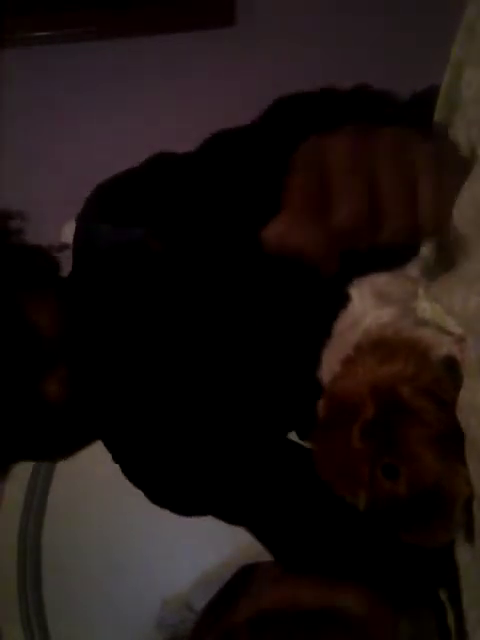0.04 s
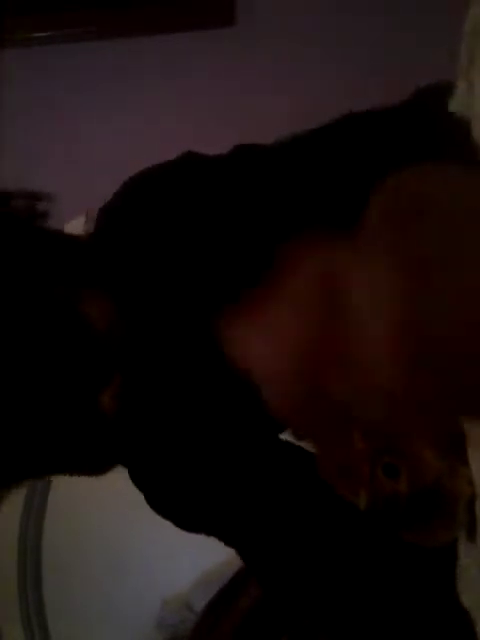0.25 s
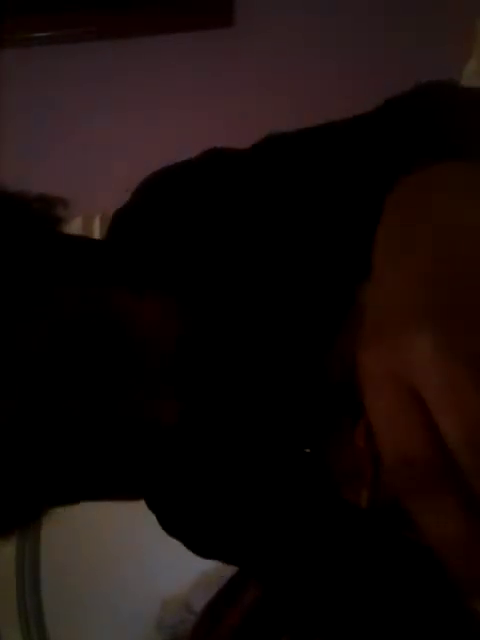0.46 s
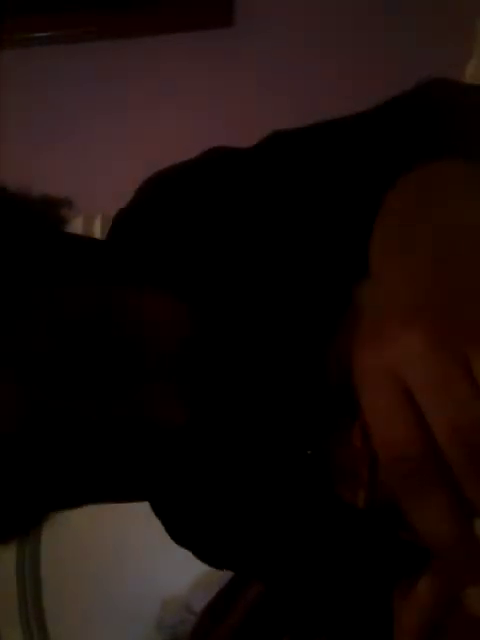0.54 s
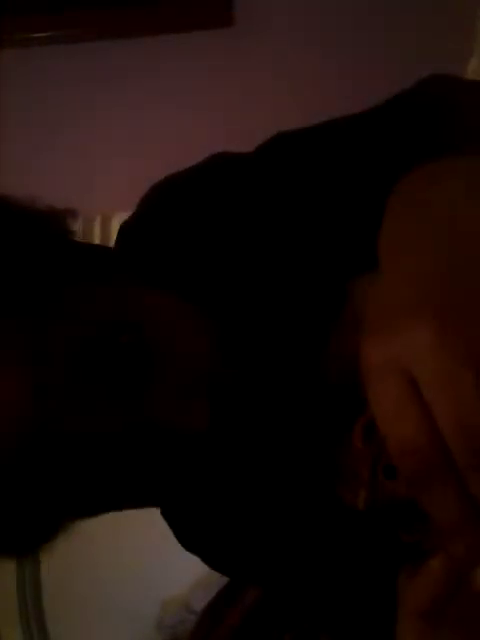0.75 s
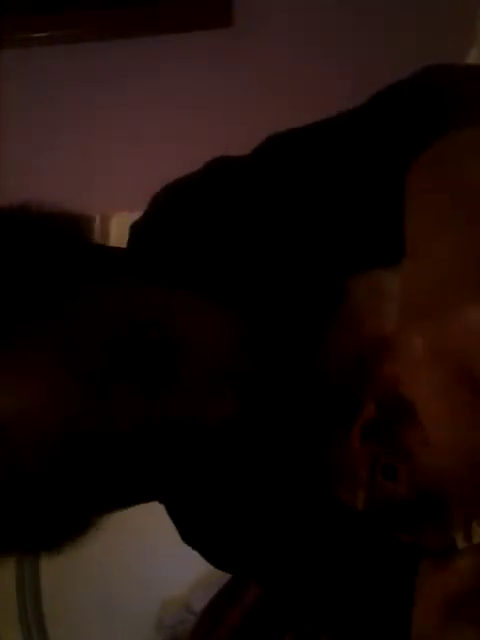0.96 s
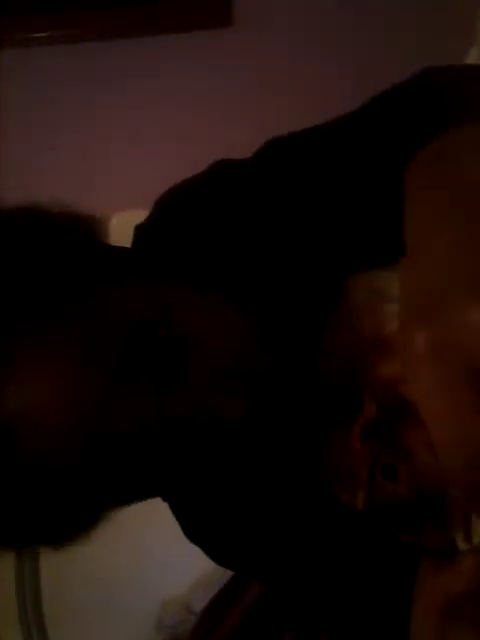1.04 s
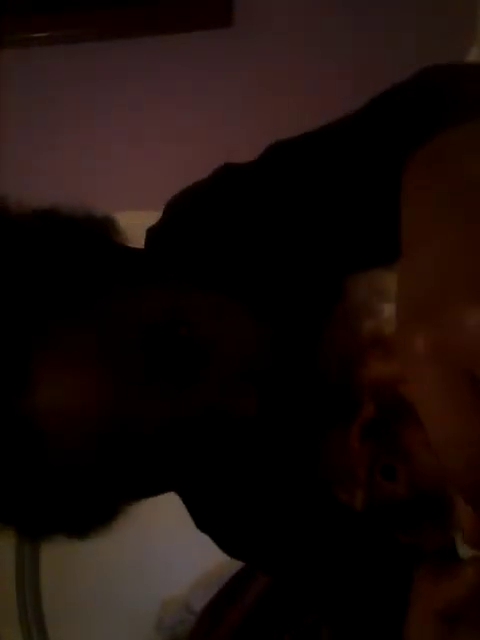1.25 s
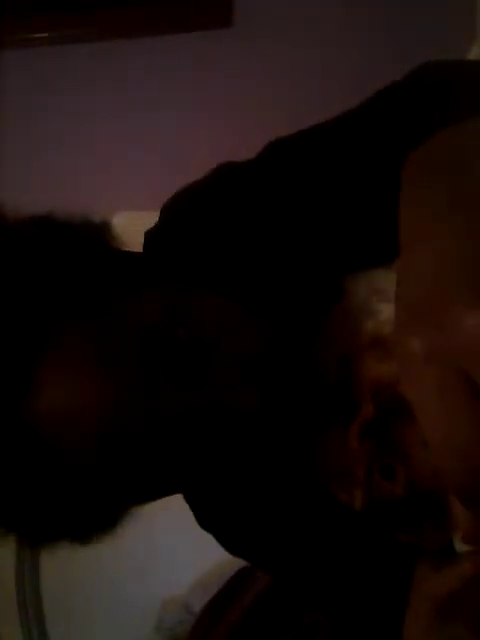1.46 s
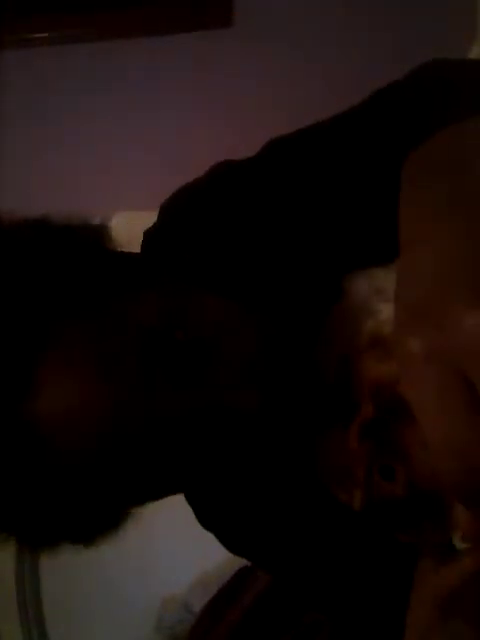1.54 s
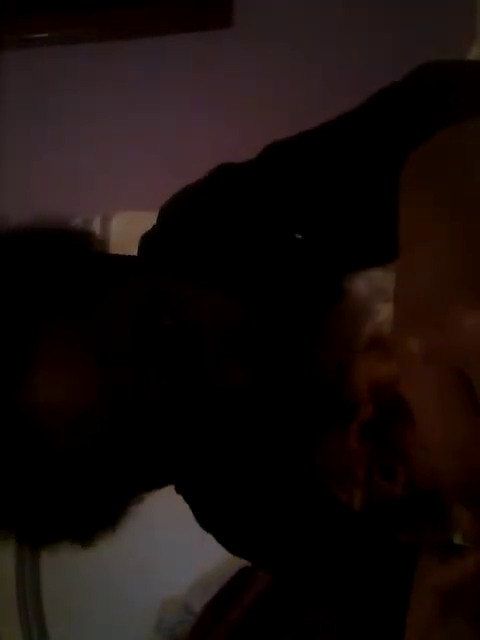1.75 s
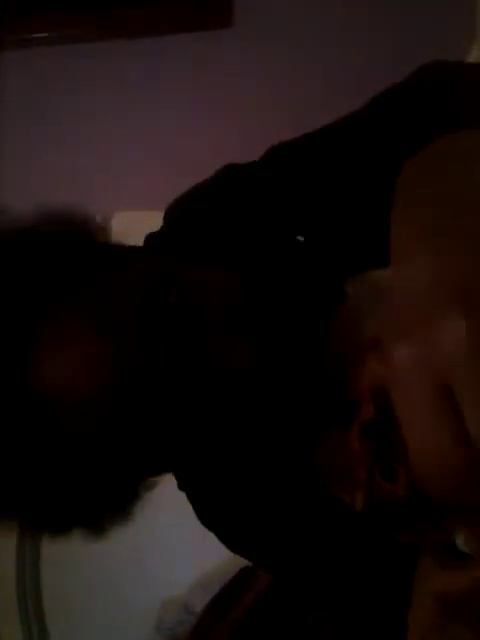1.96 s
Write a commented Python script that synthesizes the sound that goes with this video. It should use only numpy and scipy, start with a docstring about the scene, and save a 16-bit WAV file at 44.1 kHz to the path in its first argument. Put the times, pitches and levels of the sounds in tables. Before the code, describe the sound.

Four clear, whistling guinea pig squeals sweep upward one after another with uneven pauses, some starting with a rough croak or crack; one soft rustle, short room ring and low appliance hum, recorded close in stereo.

```python
"""A small whimper, then four rising squeals: a guinea pig close to the microphone in a quiet bedroom.
Each squeal is a nearly pure tone with weaker overtones shaped by the throat; rougher sounds lead into
the first three and a very faint falling tone comes just before the fourth, which turns hoarse for a moment.
Short spits of noise mark the cracks of the voice, and one soft rustle of handling is made of noise.
A decaying noise tail makes the room ring briefly over room noise and a low, wavering appliance hum."""
import sys
import numpy as np
from scipy import signal
from scipy.fft import rfft, irfft
from scipy.io import wavfile

SR = 44100
rng = np.random.default_rng(int(sys.argv[2]) if len(sys.argv) > 2 else 0)


def master_out(mix):
    """Clip the mix to full scale and print it as 16-bit PCM to the path in sys.argv[1]."""
    frames = np.transpose(np.atleast_2d(mix))
    ceiling = np.clip(frames, -1, 1)
    pcm = np.round(ceiling * 32767).astype(np.int16)
    wavfile.write(sys.argv[1], SR, pcm)


N = 88376
TIME = np.arange(N) / SR   # seconds
BINS = np.maximum(np.arange(N + 1) * SR / (2 * N), 1)   # Hz, for transforms of length 2 N


def from_db(db):
    """Decibels to gain."""
    return 10 ** (np.asarray(db) / 20)


def rms_one(x):
    """Scale to unit rms."""
    return x / np.sqrt(np.mean(x ** 2) + 1e-20)


def at_hz(points, hz, axis=1):
    """Read a column of a table on a log-frequency axis."""
    points = np.array(points)
    return np.interp(np.log(hz), np.log(points[:, 0]), points[:, axis])


def filtered(x, response):
    """Apply a frequency response, zero-padded to twice the length."""
    return irfft(rfft(x, 2 * N) * response)[..., :N]


def noise(spectrum):
    """Coloured noise of unit rms: the table gives only the shape of its spectrum."""
    return rms_one(filtered(rng.standard_normal(N), from_db(at_hz(spectrum, BINS))))


def drift(hz):
    """Random wandering of unit rms, mostly slower than hz."""
    return rms_one(filtered(rng.standard_normal(N), 1 / (1 + (BINS / hz) ** 2)))


def gate(start, end, attack, release):
    """Fully open from start to end, with smooth edges outside."""
    nearness = np.minimum((TIME - start) / attack, (end - TIME) / release)
    return np.sin(np.pi / 2 * np.clip(nearness + 1, 0, 1)) ** 2


# Throat response, low and high part. Each row: frequency in Hz, gain in dB.
THROAT_LOW = [(1000, -1.5), (1500, 5.5)]
THROAT_HIGH = [(1800, -13.5), (2100, 3), (2400, -10), (2750, -6), (3100, -9), (3600, -14.5), (4100, -10),
               (4500, -12.5), (4950, -6), (5450, -13), (5950, -20.5), (6700, -38), (7400, -38), (7900, -50),
               (8500, -40.5), (9500, -52), (11000, -80)]
# Spectrum shape of the breath. Each row: frequency in Hz, relative level in dB per Hz.
BREATH = [(300, -33), (700, -13.5), (1100, 5.5), (2300, -9), (3500, -14), (5100, -11), (6200, -24),
          (7200, -39), (10000, -39), (16000, -60.5)]
# Where the voice doubles its period. Each row: start in s, end in s, strength of the half-tones in dB.
HOARSE = [(1.618, 1.668, -1)]
# Half-tones before that strength. Each row: frequency in Hz, level in dB relative to the fundamental.
HALF_TONES = [(450, -27), (1380, -13.5), (2300, -15.5), (3200, -26.5), (4100, -23), (5000, -29),
              (5950, -41), (6800, -59.5)]
HOARSE_EDGE_S, HOARSE_JITTER = 0.01, 0.0049   # jitter and waver are rms shares of the pitch
JITTER_HZ, WAVER, WAVER_HZ = 260, .003, 35.5
OVERTONE_FLUTTER_DB, FLUTTER_HZ = 1, 38


def voice(rows, attack, release, jitter, breath_db, count=8):
    """A strong fundamental, overtones through the throat, hoarse half-tones, breath pulsing each cycle."""
    seconds, *columns = np.transpose(rows)
    envelope = gate(seconds[0], seconds[-1], attack, release)
    on = envelope > 0
    pitch, level_db, overtone_db, slope_db = (np.interp(TIME[on], seconds, c) for c in columns)
    hoarse = sum(from_db(db) * gate(start, end, HOARSE_EDGE_S, HOARSE_EDGE_S)[on]
                 for start, end, db in HOARSE)

    unsteady = (jitter + HOARSE_JITTER * hoarse) * drift(JITTER_HZ)[on]
    unsteady += WAVER * drift(WAVER_HZ)[on]
    phase = 2 * np.pi * np.cumsum(pitch * (1 + unsteady)) / SR

    breath = from_db(breath_db) * noise(BREATH)[on] * (1 + np.cos(phase))
    tone = np.cos(phase) + breath
    throat = list(THROAT_LOW) + list(THROAT_HIGH)
    for k in range(1, count):
        whole, half = k + 1, k - .5   # multiples of the pitch
        strength = from_db(overtone_db + OVERTONE_FLUTTER_DB * drift(FLUTTER_HZ)[on])
        colour = from_db(at_hz(throat, whole * pitch) + slope_db * np.log2(whole / 2))
        tone += strength * colour * np.cos(whole * phase)
        tone += hoarse * from_db(at_hz(HALF_TONES, half * pitch)) * np.cos(half * phase)

    out = np.zeros(N)
    out[on] = tone * from_db(level_db) * envelope[on]
    return out


# The four squeals, close up, before ports and room. Each row: time in seconds, pitch in Hz,
# level of the fundamental in dB, overtones relative to it in dB before the throat,
# their slope in dB per octave above the second harmonic.
SQUEAL_1 = [(0.093, 996, -31, -32.5, -2), (0.1, 1008, -25.5, -35, 6), (0.111, 1218, -23, -14.5, -12),
            (0.13, 1318, -19.5, -11.5, -7.5), (0.137, 1185, -18.0, -6, -5), (0.157, 1232, -18, -4.0, -8),
            (0.18, 1340, -16.5, -9.5, 2), (0.205, 1508, -22.0, 0.5, -7), (0.23, 1677.0, -21.0, -1.5, -8),
            (0.245, 1813, -19.5, -7.5, -1.5), (0.28, 1946, -23, -9.5, 4), (0.315, 2034, -20, -14.5, -3.5),
            (0.35, 2019, -28, -15.5, -1.5)]
SQUEAL_2 = [(.532, 981.6, -15, -10.5, -2), (0.546, 999, -12, -14.5, -5), (0.566, 1147, -12.5, -13.5, -8.5),
            (.587, 1178, -11, -17.5, -5.5), (.603, 1276, -11.5, -16, 0.5), (0.622, 1377, -11.5, -28.5, 5.5),
            (0.636, 1421, -13, -22, 4), (0.664, 1562, -13.5, -4.5, -13), (.7, 1714, -14.5, -17.5, 5.5),
            (0.732, 1786, -18.5, -8, -6.5), (0.754, 1848, -26.5, -4.5, -26)]
SQUEAL_3 = [(0.972, 1169, -25.0, -9, -11.5), (0.984, 1214, -18, -5, -17.5), (1.025, 1181, -17.0, -5.0, -8),
            (1.07, 1215, -17.0, -1.5, -11), (1.1, 1277, -15.5, -5, -9), (1.118, 1387, -15.5, -7, -7.5),
            (1.137, 1557, -16.5, 0.5, -7), (1.16, 1668, -15.5, -5.5, -6), (1.196, 1790, -20.0, -1.0, -10.5),
            (1.226, 1857, -27, -4, -24)]
SQUEAL_4 = [(1.578, 1063, -23, -9, -7.5), (1.606, 1011, -20, -8, -7), (1.618, 932, -21.5, -6, -9),
            (1.644, 908.2, -22.5, -4, -12.5), (1.671, 932, -21.5, -9, -10.5),
            (1.687, 992.6, -19, -10.5, -9.5), (1.707, 1027, -23, -11, -8.5), (1.741, 1185, -24.5, 0, -22),
            (1.774, 1213, -24.5, 0, -23), (1.815, 1345, -23, -8.5, -22), (1.845, 1371, -24.5, -13.5, -17.5)]
# Half-voiced sounds that lead into the first three squeals. Each row: the same columns and units.
WHIMPER = [(.007, 871, -43.5, -22.5, -12), (.027, 740, -37, -20, -14), (.042, 783, -40, -17, -8.5),
           (.052, 970, -38.5, -11, -10.5), (.059, 830, -44, -3.5, -10)]
CROAK = [(0.5183, 753, -33.5, 5, -3), (0.521, 808, -28, -2, -1), (0.527, 804, -29, -2.5, 2)]
PEEP = [(.956, 1413, -44, -23.5, -4.5), (0.966, 1387, -53.5, -24, -9.5)]
# A very faint falling tone just before the fourth squeal. Each row: the same columns and units.
FAINT_GLIDE = [(1.554, 1126, -49, -17.5, -6), (1.572, 1045, -40.5, -25, -12)]
# Cracks of the voice. Each row: time of the peak in seconds, level in dB, decay constant in seconds.
CRACKS = [(.134, -36, 0.0046), (0.5196, -32, 0.0016), (0.531, -29.5, .002), (.617, -40, 0.0046),
          (0.98, -34.5, 0.0031), (1.578, -40, 0.0016), (1.612, -38, 0.0073)]
ATTACK_S, RELEASE_S, ROUGH_EDGE_S = .005, 0.014, .003
JITTER, ROUGH_JITTER = 0.0016, 0.019   # rms share of the pitch
BREATH_DB, ROUGH_BREATH_DB = -39, -20.5   # relative to the tone, before the pulsing
CRACK_RISE_S = 0.00095


def guinea_pig():
    """Clear squeals, rougher sounds before them, and a spit of noise at each crack of the voice."""
    squeals = sum(voice(rows, ATTACK_S, RELEASE_S, JITTER, BREATH_DB)
                  for rows in (SQUEAL_1, SQUEAL_2, SQUEAL_3, SQUEAL_4))
    rough = sum(voice(rows, ROUGH_EDGE_S, ROUGH_EDGE_S, ROUGH_JITTER, ROUGH_BREATH_DB)
                for rows in (WHIMPER, CROAK, PEEP, FAINT_GLIDE))
    cracks = 0
    for peak, db, decay in CRACKS:
        fall = np.maximum((peak - TIME) / CRACK_RISE_S, (TIME - peak) / decay)
        cracks = cracks + from_db(db) * np.exp(-fall)
    return squeals + rough + cracks * noise(BREATH)


# Soft handling near the microphone. Each row: time of the peak in seconds, level in dB, width in seconds.
RUSTLES = [(0.404, -50.5, 0.017)]


def rustle():
    """A brief soft swell of noise, with the same colour as the breath."""
    swell = sum(from_db(db) * np.exp(-((TIME - peak) / width) ** 2) for peak, db, width in RUSTLES)
    return noise(BREATH) * swell


# The two microphone ports. Each row: frequency in Hz, left leads by radians, left minus right in dB.
PORTS = [(100, 0.13, -4), (926, .4, -2), (1200, 0.75, 0), (1800, 0.63, 3.5), (2620, 0.48, 0.2),
         (4000, 1.2, 0), (5030, 1.58, 5), (7000, 1.1, 1), (16000, 0.059, 0)]


def ports(x):
    """The direct sound leads at the left port; which port is louder depends on frequency."""
    half = from_db(at_hz(PORTS, BINS, axis=2) / 2) * np.exp(.5j * at_hz(PORTS, BINS, axis=1))
    return filtered(x, np.array([half, 1 / half]))


# Colour of the bedroom's reverberation. Each row: frequency in Hz, gain in dB added to ROOM_DB.
ROOM_COLOUR = [(300, -5), (1000, -2.5), (2000, 4), (3500, 5), (5300, 5), (8000, -2.5)]
ROOM_DB, ROOM_ONSET_S, ROOM_T60_S = -19, .004, .5
EARLY_DB, EARLY_T60_S = 6.5, 0.22   # nearby surfaces, relative to the start of the tail


def bedroom(x):
    """Quick reflections from nearby surfaces and a short diffuse tail, different at each port."""
    decay = from_db(-60 * TIME / ROOM_T60_S) + from_db(EARLY_DB - 60 * TIME / EARLY_T60_S)
    tail = rng.standard_normal((2, N)) * decay * (TIME > ROOM_ONSET_S)
    tail /= np.sqrt(np.sum(tail ** 2, axis=1, keepdims=True))   # unit energy
    return filtered(x, rfft(tail, 2 * N) * from_db(ROOM_DB + at_hz(ROOM_COLOUR, BINS)))


# Spectrum shape of the room noise. Each row: frequency in Hz, relative level in dB per Hz.
FLOOR = [(25, -30.5), (45, -13.5), (80, -15.5), (120, -10), (160, -8.5), (235, -1.5), (275, -3),
         (320, -14.5), (500, -12.5), (1000, -14), (2000, -19.5), (4000, -25), (5200, -30.5), (6500, -38.5),
         (9000, -39), (16000, -44)]
# How alike the noise is at both ports. Each row: frequency in Hz, left-right likeness (correlation).
FLOOR_LIKENESS = [(50, 0.37), (250, 0.84), (1000, 0), (4000, 0), (8000, 0)]
# Appliance hum, equal at both ports. Each row: frequency in Hz, rms level in dB before the waver.
HUM = [(120, -62.5), (265.5, -57.5), (441, -68)]
FLOOR_DB = -50.5   # rms at each port
HUM_WAVER, HUM_WAVER_HZ = 0.24, 3.7   # rms share of the level; speed


def background():
    """Room noise, partly shared by the ports, and an appliance hum of sines that waver in level."""
    alike = np.clip(at_hz(FLOOR_LIKENESS, BINS), -1, 1)
    mid = filtered(noise(FLOOR), np.sqrt((1 + alike) / 2))
    side = filtered(noise(FLOOR), np.sqrt((1 - alike) / 2))
    hum = 0
    for hz, db in HUM:
        sine = np.sqrt(2) * np.sin(2 * np.pi * (hz * TIME + rng.random()))
        hum = hum + from_db(db) * sine * (1 + HUM_WAVER * drift(HUM_WAVER_HZ))
    return from_db(FLOOR_DB) * np.array([mid + side, mid - side]) + hum


def scene():
    """The animal and the rustle up close, their room and the background."""
    near = guinea_pig() + rustle()
    return ports(near) + bedroom(near) + background()


CUTOFF_HZ = 15750


def record(dry):
    """A steep elliptic low-pass cuts off the top."""
    lowpass = signal.ellip(12, .1, 80, CUTOFF_HZ, fs=SR, output="sos")   # ripple, stopband in dB
    return signal.sosfilt(lowpass, dry)


dry = scene()
out = record(dry)
master_out(out)
```